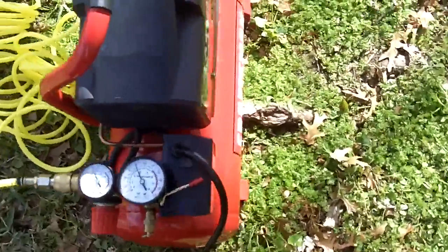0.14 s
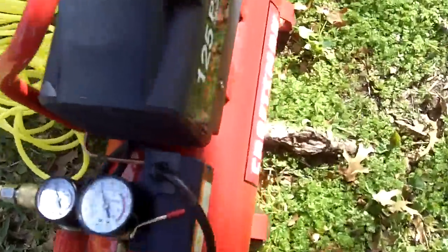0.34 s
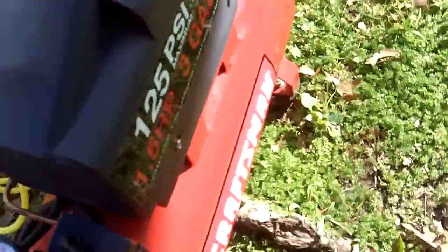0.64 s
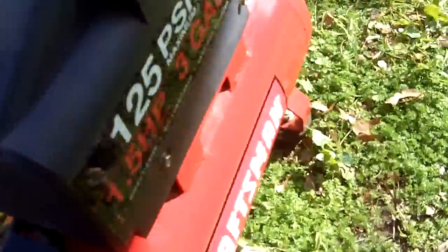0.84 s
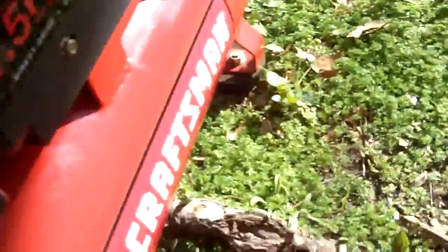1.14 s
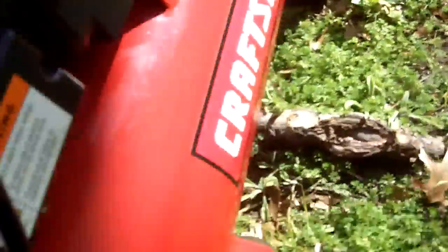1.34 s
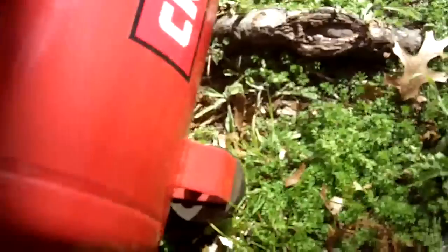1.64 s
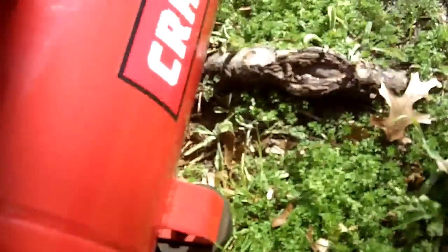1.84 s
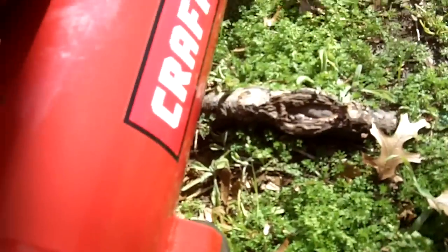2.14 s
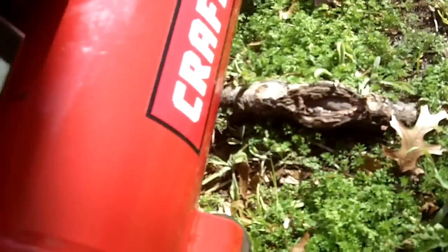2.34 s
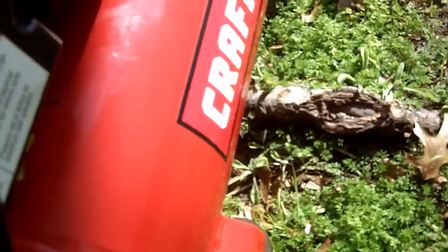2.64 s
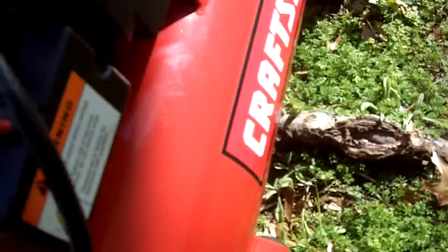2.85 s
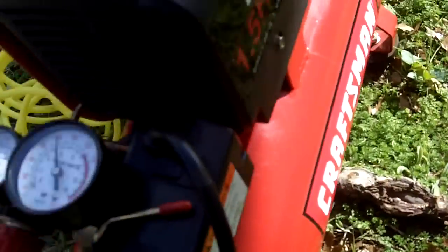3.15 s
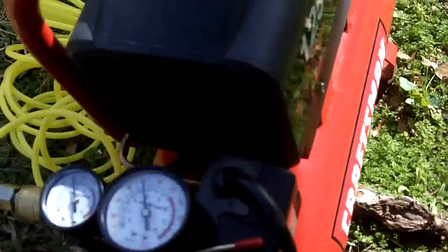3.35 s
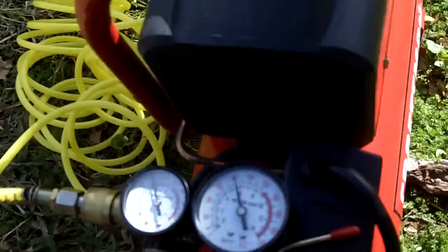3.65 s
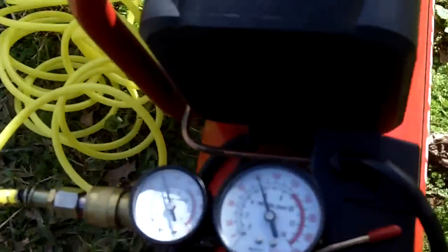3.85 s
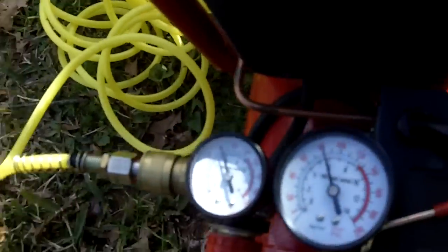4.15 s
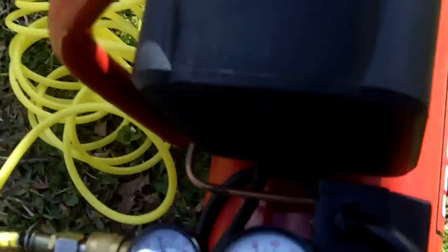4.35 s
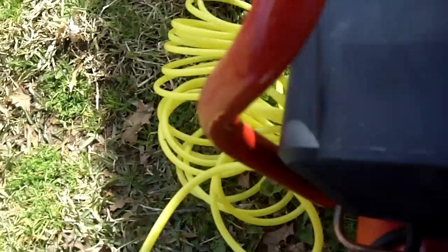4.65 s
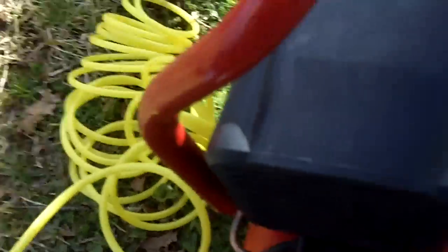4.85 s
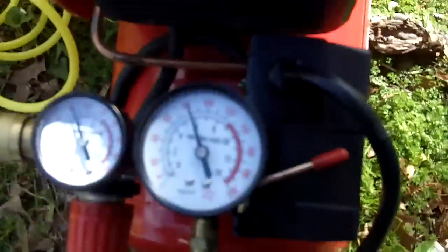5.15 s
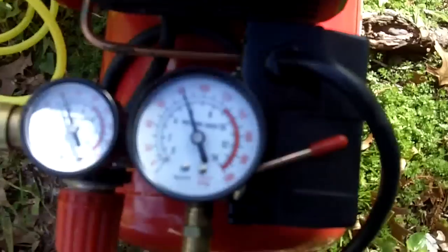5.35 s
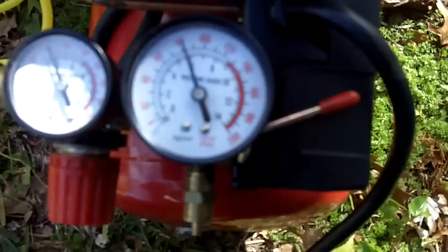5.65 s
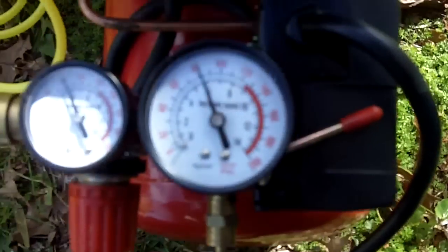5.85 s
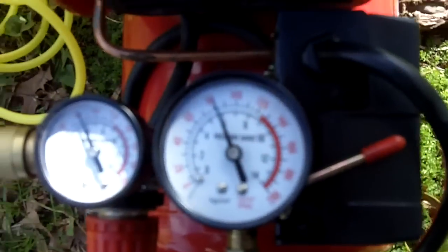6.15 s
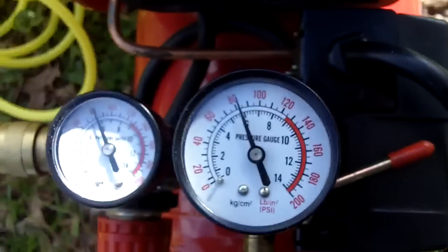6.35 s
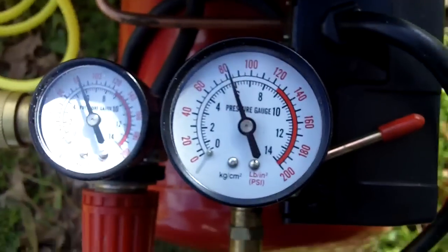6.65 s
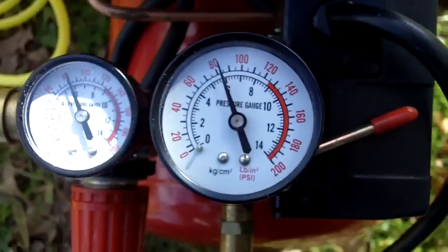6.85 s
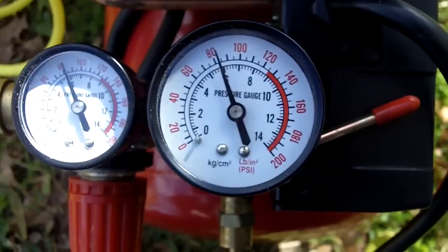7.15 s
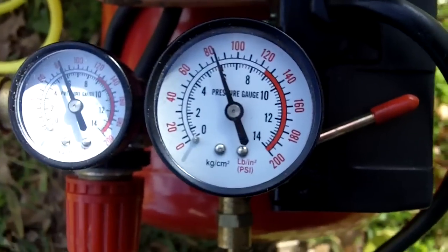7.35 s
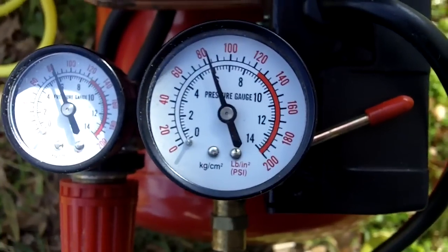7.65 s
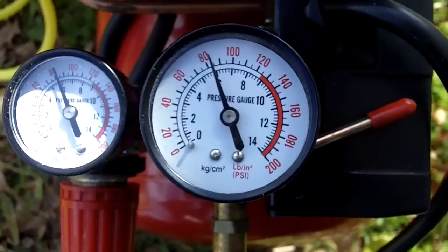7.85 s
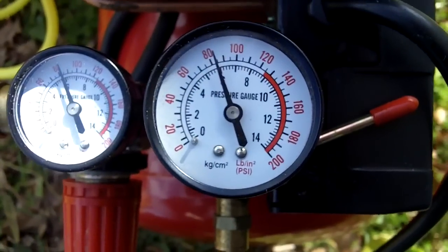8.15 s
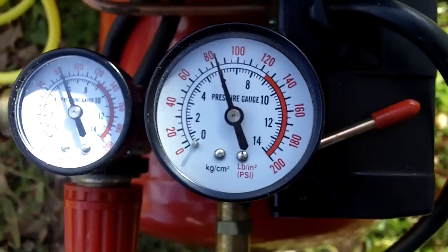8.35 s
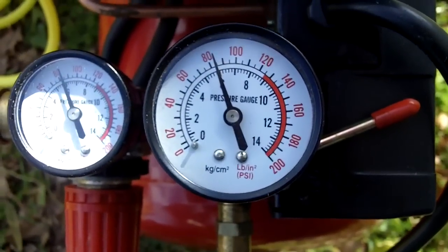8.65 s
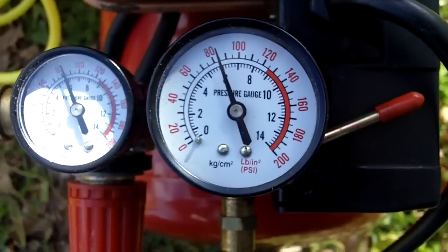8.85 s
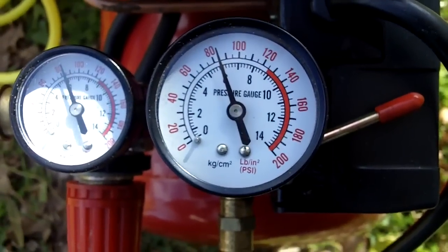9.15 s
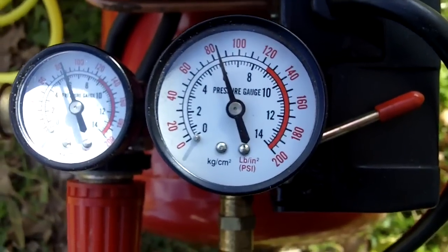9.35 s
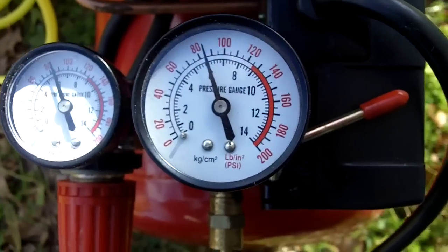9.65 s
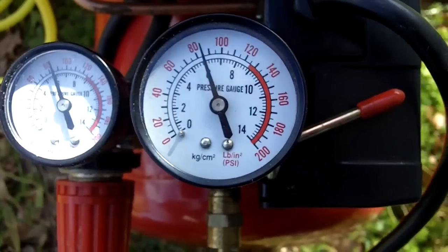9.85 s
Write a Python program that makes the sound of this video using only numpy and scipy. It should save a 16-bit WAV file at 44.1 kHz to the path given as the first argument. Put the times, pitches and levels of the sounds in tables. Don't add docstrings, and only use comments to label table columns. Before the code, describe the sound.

A small piston air compressor runs outdoors on grass, a fast pounding metallic roar with raspy hiss and rattling covers, heard very close.

```python
import sys
import numpy as np
from scipy import signal
from scipy.fft import rfft, irfft, next_fast_len
from scipy.io import wavfile

SR = 44100
rng = np.random.default_rng(int(sys.argv[2]) if len(sys.argv) > 2 else 0)


def log_audio(samples):
    frames = np.atleast_2d(samples).T
    limited = np.clip(frames, -1, 1)
    pcm = np.round(limited * 32767).astype(np.int16)
    wavfile.write(sys.argv[1], SR, pcm)


def voltage_ratio(level):
    return 10 ** (np.asarray(level, float) / 20)


N = 440559


def rms_one(x):
    return x / np.sqrt(np.mean(x ** 2) + 1e-20)


def in_time(rows):
    s, *columns = np.transpose(rows)
    return [np.interp(np.arange(N) / SR, s, c) for c in columns]


def drift(rate_hz, step=1):
    coarse = 40
    r = np.exp(-2 * np.pi * coarse * rate_hz / SR)
    noise = rng.standard_normal(N // coarse + 2002)
    slow = rms_one(signal.lfilter([1], [1, -2 * r, r * r], noise)[2000:])
    return np.interp(np.arange(0, N, step) / coarse, np.arange(len(slow)), slow)


def colour(x, points):
    size = next_fast_len(N)
    hz, level_db = np.transpose(points)
    bins_hz = np.arange(size // 2 + 1) * SR / size
    gain = voltage_ratio(np.interp(np.log(bins_hz + 1), np.log(hz), level_db, left=-90, right=-90))
    return rms_one(irfft(rfft(x, size) * gain, size)[:N])


def resonate(x, hz, width_hz):
    r = np.exp(-np.pi * width_hz / SR)
    return rms_one(signal.lfilter([1, 0, -1], [1, -2 * r * np.cos(2 * np.pi * hz / SR), r * r], x))


def per_turn(turns, spread):
    return spread * np.interp(turns, np.arange(-2, 600), rng.standard_normal(602))


def repeating(turns, fresh):
    pattern = rng.standard_normal(776)[(turns % 1 * 776).astype(int)]
    fresh = np.clip(fresh, 0, 1)
    return np.sqrt(1 - fresh) * pattern + np.sqrt(fresh) * rng.standard_normal(N)


def valve_gate(turns, depth_db, decay):
    opening = 0.022
    since = (turns + 0.047) % 1
    return voltage_ratio(depth_db * np.minimum(since / opening, 1) * np.exp(-since / decay))


def pump(turns, nearness, ring_db, thump_db, knock_db):
    # [multiple, level/dB]
    above_orders = [(1, -6), (2, -11), (3, -7.5), (4, -21), (5, -13), (6, -7), (7, -8), (8, -7.5), (9, -11),
                    (10, -6.5), (11, -6), (12, -8), (13, -9), (14, 3.5), (15, -3.5), (16, -19), (17, -15),
                    (18, -12), (19, -14), (20, -9), (21, -24), (22, -13), (23, -11), (24, -10), (25, -7),
                    (26, -15), (27, -29), (28, -33), (29, -38), (30, -35)]
    over_orders = [(1, -8), (2, -6), (3, -9), (4, -24), (5, -10.5), (6, -5.5), (7, -4.5), (8, -7), (9, 3.5),
                   (10, -4), (11, 3), (12, 7), (13, 12.5), (14, 11), (15, 2), (16, -33), (17, -4),
                   (18, -16), (19, -18), (20, -11.5), (21, -11), (22, -15), (23, -13), (24, -11),
                   (25, -11.5), (26, -21), (27, -17), (28, -25), (29, -24), (30, -30)]
    beside_orders = [(1, -11), (2, -5), (3, -9), (4, -21.5), (5, -20), (6, -15.5), (7, -6.5), (8, -15),
                     (9, -10.5), (10, -1.5), (11, -3), (12, 2.5), (13, 0.5), (14, -9), (15, -33),
                     (16, -9.5), (17, -31), (18, -21), (19, -43), (20, -20), (21, -14.5), (22, -14.5),
                     (23, -12), (24, -17), (25, -15.5), (26, -19), (27, -22), (28, -27), (29, -24),
                     (30, -36)]
    behind_orders = [(1, -16), (2, -13), (3, -15.5), (4, -25.5), (5, -17), (6, -14), (7, -13), (8, -19),
                     (9, -25), (10, -17), (11, -11.5), (12, -3), (13, 1), (14, -7), (15, -17.5),
                     (16, -15.5), (17, -17.5), (18, -28), (19, -28), (20, -26.5), (21, -28), (22, -24.5),
                     (23, -33), (24, -22.5), (25, -28), (26, -36), (27, -23.5), (28, -21.5), (29, -30.5),
                     (30, -21.5)]
    gauge_orders = [(1, -17.5), (2, -13), (3, -15), (4, -23), (5, -18.5), (6, -15.5), (7, -14), (8, -18.5),
                    (9, -26.5), (10, -11.5), (11, -10.5), (12, -3.5), (13, -1), (14, -8), (15, -16),
                    (16, -14), (17, -18.5), (18, -26.5), (19, -22.5), (20, -18.5), (21, -28.5), (22, -24),
                    (23, -26), (24, -24), (25, -20), (26, -18), (27, -29), (28, -21), (29, -36), (30, -24)]
    ring_lead = np.array([0.0, .1, -.2, .05, .55])
    ring_swing = np.array([3.6, 2.8, 1.6, 0, 0])
    ring_lag = np.array([.8, .8, 0, 0, 0])
    behind_shroud = np.array([0, 0, 0, 1, 1])
    # [first order, last order, wobble/dB, jitter/turns]
    steadiness = ((1, 8, .3, .0012), (9, 17, .6, .0010), (18, 36, 1.4, .0015))

    step = 6
    turns, nearness = turns[::step], nearness[:, ::step]
    places = [above_orders, over_orders, beside_orders, behind_orders, gauge_orders]
    order_db = np.array(places)[:, :, 1]
    order_db = np.hstack([order_db, -32.5 + 3.5 * rng.standard_normal(size=(5, 6))])
    scatter = rng.normal(0, 0.75, order_db.shape)
    out = 0
    for (first, last, wobble_db, jitter), level_db in zip(steadiness, (thump_db, ring_db, knock_db - 0.5)):
        angle = 2 * np.pi * (turns + per_turn(turns, jitter))
        group, power = 0, 0
        for k in range(first, last + 1):
            lead = ring_lead * (k - 12.8) * (11 < k < 15)
            apart = (2.7 + 1.15 * (k - 15)) * (14 < k < 18) - 1.4 * (9 < k < 12)
            lead = lead + behind_shroud * apart
            swing = ring_swing * np.exp(-(k - 10.9) ** 2 / .5)
            body = .8 - .65 * (k - 1) if k < 5 else .85 - .4 * (k - 5)
            body = body * (k < 9) + .9 * (k == 9)
            shift = body + lead - swing - ring_lag * (11 < k < 17) + scatter[:, k - 1] * (k > 17)
            size = (voltage_ratio(order_db[:, k - 1]) * np.exp(1j * shift)) @ nearness
            size = size * voltage_ratio(0.62 * drift(4.2, step))
            group = group + (size * np.exp(1j * k * angle)).real
            power = power + np.abs(size) ** 2 / 2
        out = out + voltage_ratio(level_db[::step] + per_turn(turns, wobble_db)) * group / np.sqrt(power)
    return signal.resample_poly(out, step, 1)[:N]


def rattle(turns, peaks):
    knocks = repeating(turns, fresh=0.23) * valve_gate(turns, depth_db=7.5, decay=0.34)
    ringing = 0
    for hz, width_hz, level_db in peaks:
        flicker = voltage_ratio(level_db + 1.8 * drift(5.8))
        ringing = ringing + flicker * np.sqrt(width_hz) * resonate(knocks, hz, width_hz)
    return rms_one(ringing)


def valves(turns, nearness, knock_db, hiss_db):
    # [f/Hz, level per Hz/dB]
    air_curve = [(30, -14), (150, -9), (300, -9.5), (600, 0), (800, -2.5), (1100, -6), (1500, -6),
                 (2100, -10), (2600, -20), (3000, -36)]
    hiss_curve = [(2000, -41), (2500, -4.5), (3500, -5.5), (4200, -5), (5000, -10.5), (6000, -3),
                  (7000, 0.5), (8500, -4), (10000, -11), (12000, -25), (15000, -48)]
    # [f/Hz, width/Hz, level/dB]
    top_peaks = [(1890, 160, -1), (2165, 57, 3.5), (3310, 60, -2), (3480, 54, -2), (3950, 160, 5),
                 (4800, 22, 4), (6140, 58, 1), (6860, 80, 1.5), (6830, 270, -5), (7940, 74, 2)]
    side_peaks = [(1916, 56, 4.5), (2210, 86, -5.5), (2640, 27, -7), (3494, 71, -5.5), (3870, 40, 3),
                  (4470, 18, -6), (4945, 12, -0.5), (6490, 92, 0), (6960, 69, -7), (7800, 30, -7),
                  (7900, 120, -15), (8840, 150, -28), (10650, 130, -18.5)]
    back_peaks = [(1935, 56, -15), (2305, 16, 1), (3300, 46, 0), (3820, 50, 5), (4120, 120, 0.5),
                  (4350, 16, -10), (4600, 16, 1), (4900, 29, -4), (6430, 140, -5), (7000, 1200, -13.5),
                  (7960, 58, -19)]
    gauge_peaks = [(2050, 110, -2.5), (2340, 23, -1.5), (2730, 45, -3), (3306, 17, 6.5), (3905, 9.2, 9),
                   (4163, 21, 7.5), (4960, 53, 0.5), (5800, 115, 2.5), (5930, 57, -18), (6330, 35, 0),
                   (7080, 72, 4), (7950, 50, -3), (9250, 66, -21), (9340, 41, -10)]

    air = colour(rng.standard_normal(N) * valve_gate(turns, depth_db=11.0, decay=0.11), air_curve)
    puffs = valve_gate(turns, depth_db=8.0, decay=0.45) * voltage_ratio(per_turn(turns, 1.3) + 0.35 * drift(63))
    hiss = colour(repeating(turns, fresh=.85) * puffs, hiss_curve)
    leak = colour(rng.standard_normal(N) * puffs, [(8000, -20), (11000, 6), (15000, -11), (15600, -30)])
    leak = voltage_ratio(-17) * nearness[4] * leak
    ringing = np.sqrt(nearness[:2].sum(0)) * voltage_ratio(-2.5) * rattle(turns, top_peaks)
    ringing += nearness[2] ** 0.28 * voltage_ratio(-2) * rattle(turns, side_peaks)
    ringing += np.sqrt(nearness[3]) * voltage_ratio(-5) * rattle(turns, back_peaks)
    ringing += np.sqrt(nearness[4]) * voltage_ratio(-2.5) * rattle(turns, gauge_peaks)
    return voltage_ratio(knock_db - 1.5) * air + voltage_ratio(hiss_db - 1.0) * (hiss + leak) + voltage_ratio(hiss_db) * ringing


def handling():
    # [t/s, peak level/dB]
    taps = [
        (6.4479, 4),
    ]
    t = np.arange(N) / SR
    breeze = colour(rng.standard_normal(N), [(8, 0), (30, -2), (50, -12), (90, -30)])
    breeze = breeze * voltage_ratio(-47 + 4.5 * drift(3))
    burst = np.zeros(N)
    for s, peak_db in taps:
        burst += voltage_ratio(peak_db) * np.exp(-((t - s) / 0.0011) ** 2)
    crack = colour(rng.standard_normal(N), [(300, -8), (2300, -4), (3500, -5), (5500, -5), (7300, 5),
                                            (9500, -11), (14500, -8), (15500, -10)])
    for hz in (7300, 2400, 3500):
        crack = crack + .7 * np.sin(2 * np.pi * hz * t)
    thud = voltage_ratio(-26) * colour(rng.standard_normal(N), [(8, 0), (40, -4), (80, -20)])
    thud = thud * np.interp(t - taps[0][0], [-.01, .005, .2], [0, 1, 0])
    return breeze + voltage_ratio(-14) * burst * crack + thud


def gain_control():
    # [t/s, depth/dB]
    ducks = [(.8, 2), (1.86, 3), (2.15, 3.5), (2.39, 2), (5.44, 1), (6.445, 6.5), (7.7, 2.5), (7.93, 2.5),
             (8.11, 2.5), (8.82, 1.5), (9.1, 0.5)]
    drop_s, recovery_db_per_s = 0.01, 25
    t = np.arange(N) / SR
    gain_db = np.zeros(N)
    for s, depth_db in ducks:
        gain_db -= np.interp(t, [s - drop_s, s, s + depth_db / recovery_db_per_s], [0, depth_db, 0])
    return gain_db


def scene():
    # [t/s, place: 0 above, 1 over shroud, 2 tank side, 3 behind shroud, 4 gauges]
    path = [(0, 0), (.28, 0), (.55, 1), (.95, 1.1), (1.2, 1.45), (1.5, 1.8), (1.9, 2), (2.9, 2),
            (3.15, 2.4), (3.3, 2.7), (3.55, 3), (4.8, 3), (5.6, 3.6), (6.8, 4), (10, 4)]
    # [t/s, distance/m]
    distance = [(0, .655), (.66, .4), (1.15, .345), (1.98, .453), (3.3, .504), (3.7, .56), (6, .638),
                (8, .662), (10, .645)]
    # [t/s, level/dB]
    loudness = [(0, -13.5), (.4, -15), (.58, -10.5), (1.0, -15), (1.7, -15.5), (2.9, -14.5), (3.6, -12.5),
                (4.2, -12), (4.9, -12.5), (5.4, -12.5), (6.3, -11.5), (7.2, -11), (8.5, -11.5), (9.99, -12)]
    # [ring/dB, thump/dB, knock/dB, hiss/dB]
    layer_mix = [
        (-2, -5, -10, -10),
        (-2.5, -5.3, -12, -11.5),
        (-0.43, -6.5, -13.5, -9.5),
        (-0.94, -9, -16, -15),
        (-1, -9.8, -15, -15.5),
    ]

    shaft_hz, thump_s, sound_m_per_s = 56.845, 0.01136, 343
    travel_s = in_time(distance)[0] / sound_m_per_s
    turns = shaft_hz * (np.arange(N) / SR - thump_s - travel_s)
    nearness = np.clip(1 - np.abs(in_time(path)[0] - np.arange(5)[:, None]), 0, 1)
    levels_db = np.transpose(layer_mix) @ nearness + in_time(loudness)[0] + gain_control()
    ring_db, thump_db, knock_db, hiss_db = levels_db
    machine = pump(turns, nearness, ring_db, thump_db, knock_db)
    machine = machine + valves(turns, nearness, knock_db, hiss_db)
    machine = machine * voltage_ratio(0.46 * drift(9) + 0.35 * drift(2.8))
    ring = signal.sosfilt(signal.butter(4, [620, 830], "band", fs=SR, output="sos"), machine)
    return machine + handling() + voltage_ratio(-32) * ring * [[-1], [1]]


def low_pass(x):
    return signal.sosfilt(signal.butter(12, 15660, fs=SR, output="sos"), x)


def record(dry):
    notch_hz, notch_width_hz = 5495, 820
    cos, r = np.cos(2 * np.pi * notch_hz / SR), np.exp(-np.pi * notch_width_hz / SR)
    zero = np.exp(-np.pi * 15 / SR)
    x = dry / (1 + np.abs(dry / 1.06) ** 5) ** .2
    notch = np.array([1, -2 * zero * cos, zero ** 2]) * (1 + r * r) / 2
    x = signal.lfilter(notch, [1, -2 * r * cos, r * r], x)
    x = x + .019 * np.array([[1.14], [.86]])
    x = signal.sosfilt(signal.cheby2(10, 50, 16200, fs=SR, output="sos"), x)
    return low_pass(np.clip(x, -1, 1))


dry = scene()
out = record(dry)
log_audio(out)
```